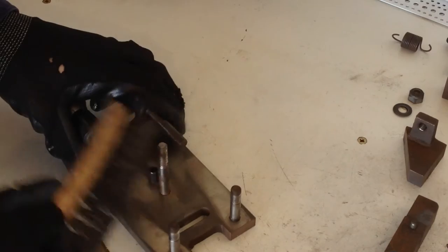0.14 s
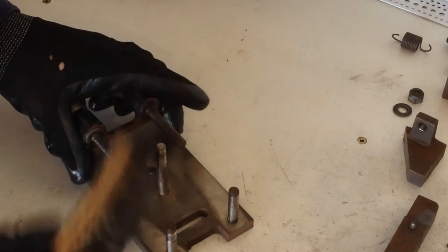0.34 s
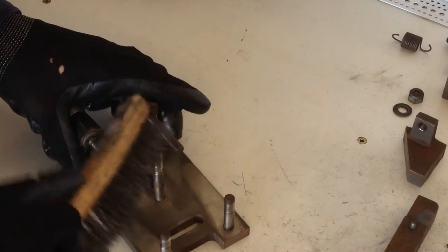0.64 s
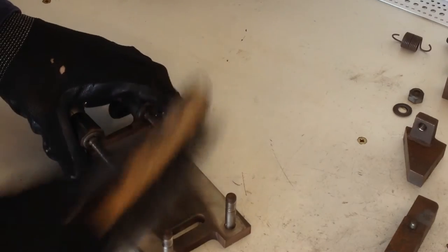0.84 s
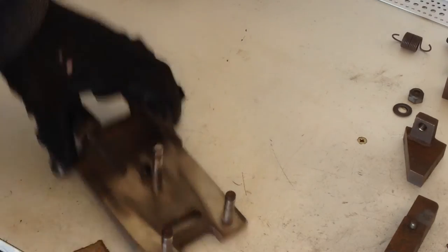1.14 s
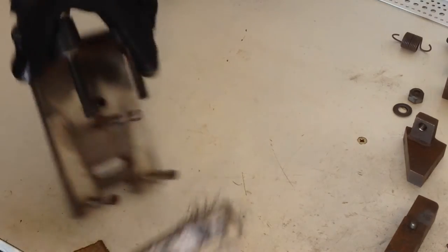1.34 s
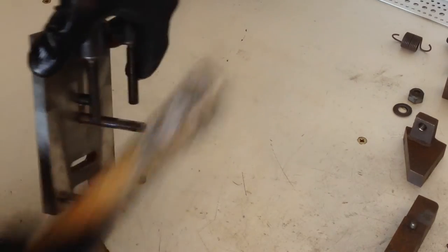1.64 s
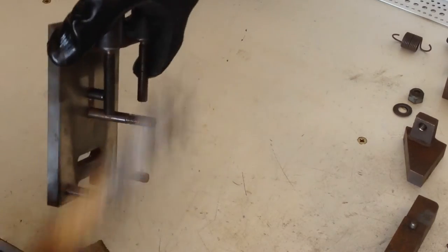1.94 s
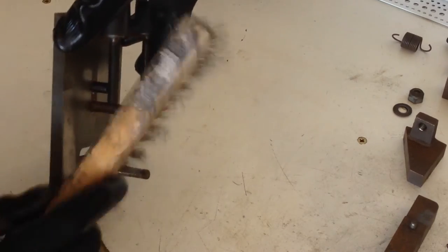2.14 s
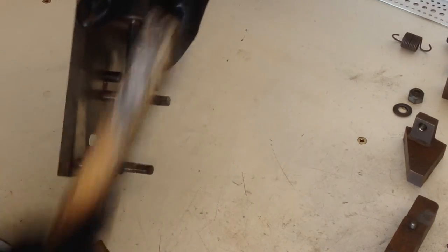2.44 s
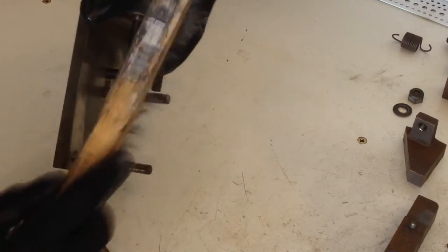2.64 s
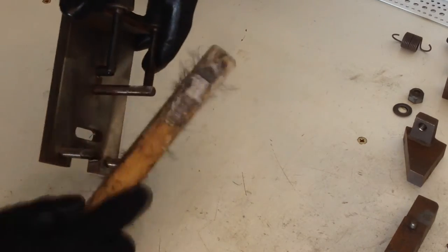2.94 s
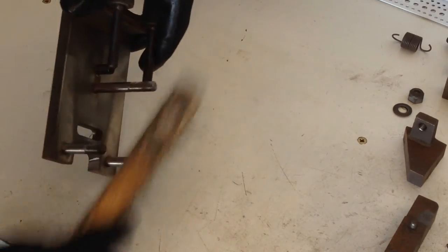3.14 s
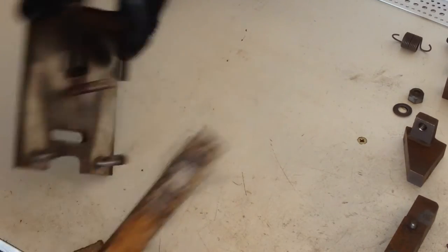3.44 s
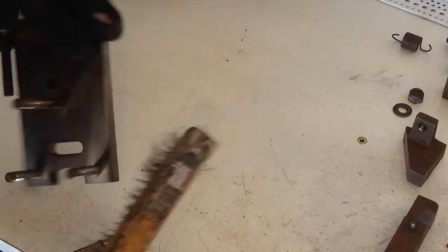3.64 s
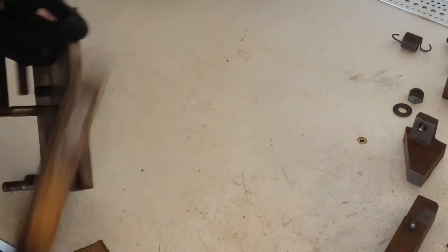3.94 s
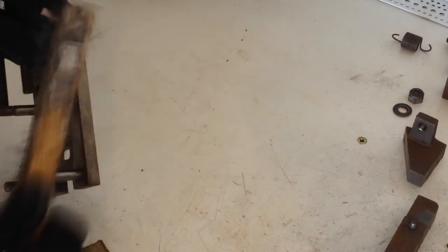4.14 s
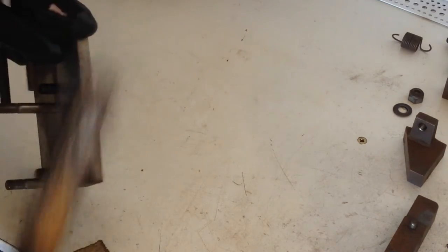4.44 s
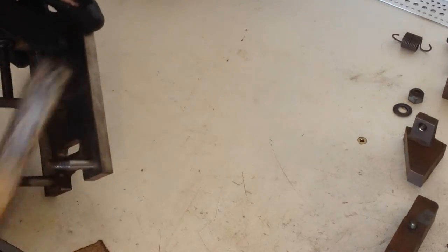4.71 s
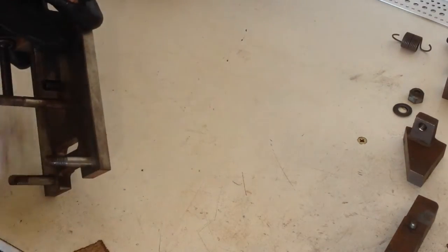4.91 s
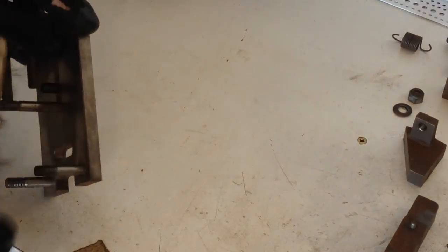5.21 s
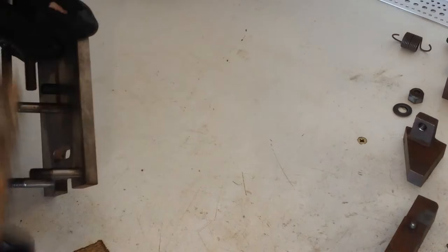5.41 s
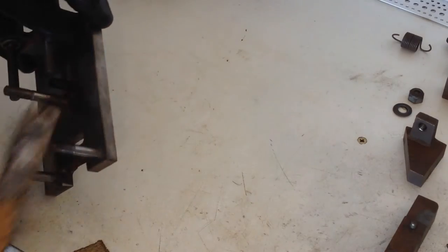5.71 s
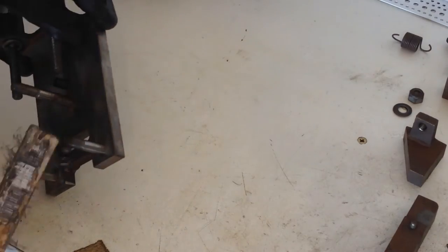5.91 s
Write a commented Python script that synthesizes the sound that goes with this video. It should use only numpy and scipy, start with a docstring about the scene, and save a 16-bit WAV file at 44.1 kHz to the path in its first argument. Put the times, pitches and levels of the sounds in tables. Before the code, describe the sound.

A wire brush scrubs a studded steel plate in quick, bright, rasping strokes, the bristles flicking off the metal and the wooden workbench booming softly underneath. Twice the brushing breaks off as the plate is knocked and dragged on the bench, the second time with the hardest knock. Then the strokes carry on. The sound is close, with short garage reflections and a faint hiss.

```python
"""A wire brush rasps in quick strokes over a studded steel plate on a garage workbench.
Wire tips land in bunches and flick off the steel; the studs squeak, the plate rings faintly
and the bench booms under it. A few times wood or steel knocks hard, and twice the plate is
dragged and turned on the bench. Short reflections and quiet air lie behind."""
import sys
import numpy as np
from scipy import signal
from scipy.io import wavfile
from scipy.ndimage import uniform_filter1d

SR = 44100
rng = np.random.default_rng(int(sys.argv[2]) if len(sys.argv) > 2 else 0)


def file_out(sig):
    """Save sig as 16-bit WAV at sys.argv[1]."""
    # one column per channel
    cols = np.atleast_2d(sig).T
    # limit, then scale
    lim = np.clip(cols, -1, 1)
    pcm = np.round(lim * 32767).astype(np.int16)
    wavfile.write(sys.argv[1], SR, pcm)


N = 267676


# start_s, land_db (re peak), rise_s, fall_s, peak_db, push_db, shake_db, bright_db, boom_hz, squeak_db
# push, shake and squeak are relative to the rasp
BRUSH_STROKES = [(0.058, -19, 0.079, 0.068, -22, -21, -23, -2.5, 306, -4.5),
                 (0.333, -6, 0.04, 0.071, -19, -15.5, -11, -26, 296, -9.5),
                 (0.501, -22, 0.019, 0.032, -22.5, -26, -18.5, -2.5, 480, -3),
                 (0.577, 3, .04, 0.12, -30, -11.5, -19, 4, 330, 2),
                 (0.857, -19.5, 0.047, 0.01, -22, -2.5, -11.5, -17, 604, 2),
                 (0.926, -15, 0.017, 0.074, -21, -13.5, -17.5, -2.5, 280, -13),
                 (1.598, -13, 0.09, 0.09, -33, -17, -40, 6.5, 220, -29),
                 (1.934, -18, 0.058, 0.08, -21.5, -20, -37.5, 2, 300, -28.5),
                 (2.221, -13, 0.051, 0.073, -21.5, -16.5, -36, 5, 175, -24),
                 (2.459, -10.5, 0.064, 0.081, -21.5, -19.5, -43, 4.5, 192, -30.5),
                 (2.7, -17.5, 0.062, 0.052, -24, -14.5, -48.5, 7.5, 200, -27),
                 (2.998, -12, 0.004, 0.061, -30, -11, -28, 4, 165, -34),
                 (3.053, -14, 0.032, 0.11, -23.5, -14.5, -43, 9, 212, -25),
                 (3.289, -8.5, 0.08, 0.088, -24, -15.5, -33, 4.5, 203, -30),
                 (3.93, -14, 0.066, 0.064, -33, -16, -31.5, 4, 192.4, -32),
                 (4.19, -21.5, 0.063, 0.077, -26, -17, -30, 4.5, 200, -29),
                 (4.441, -18, 0.073, 0.066, -26, -15, -38, 5, 190, -30.5),
                 (4.75, -12, 0.057, 0.079, -27, -18, -31, 4.5, 240, -30),
                 (5.031, -2, 0.067, 0.064, -31, -17.5, -14, 6, 400, -16),
                 (5.288, -20, 0.071, 0.02, -33, -11.5, -15.5, 9.5, 157, 0),
                 (5.406, -27, 0.037, 0.01, -36.5, -13.5, -25, -7, 158, -31),
                 (5.519, -28, 0.067, 0.055, -30.5, -13.5, -14.5, 6, 174, -19.5),
                 (5.773, 0.5, 0.057, 0.068, -29, -14, -28.5, 0, 186, -31.5),
                 (5.998, -1, 0.017, 0.05, -30.5, -12, -37.5, 0, 198, -18.5)]
def strokes():
    """Each stroke lands, swells to full pressure and lifts off, brightening as it goes."""
    lift_db, brighten_db = -39, 18
    level, push, shake, squeak = np.zeros((4, N))
    bright, boom_hz = np.ones(N), np.full(N, 200.)
    for start, land_db, rise, fall, peak_db, push_db, shake_db, bright_db, hz, squeak_db in BRUSH_STROKES:
        part, t = span(start, rise + fall)
        rising_db = land_db * abs(1 - t / rise) ** 2.13
        falling_db = lift_db * abs((t - rise) / fall) ** 2.16
        swell_db = np.where(t < rise, rising_db, falling_db)
        level[part] = gain_of(peak_db + swell_db)
        push[part] = gain_of(push_db - 0.48 * swell_db)  # bench and plate follow only part of the swell
        shake[part] = gain_of(shake_db - 0.27 * swell_db)
        bright[part] = gain_of(bright_db + brighten_db * (t / (rise + fall) - .5))
        boom_hz[part] = hz
        shake[part.stop:] = gain_of(shake_db)  # the grip stays
        squeak[part.start:] = gain_of(squeak_db)
    return uniform_filter1d(level, size=60), push, shake, bright, boom_hz, squeak


# Wire on steel: freq_hz, density_db
RASP_SPECTRUM = [(530, -53.5), (900, -39), (1210, -24.5), (1710, -12), (2420, -21), (4170, -1.5),
                 (5440, -6.5), (5820, -3), (10400, 1.5), (11800, -4), (12800, -17), (16600, -50.5),
                 (22000, -120)]
def brush():
    """Thousands of wire tips flick off the steel; the same stroke shakes plate and bench."""
    level, push, shake, bright, boom_hz, _ = strokes()
    flicks = clicks(per_s=13000, spread_db=0.5, clump_db=2.8, clump_s=0.0062)
    force = level * flicks
    rasp = coloured(wire_tips(force), RASP_SPECTRUM)
    dull = lowpass(rasp, 7000)
    rasp = dull + bright * (rasp - dull)  # a steeper brush sounds brighter
    plate_force = (level + gain_of(-9.5) * slap_force()) * flicks * shake
    steel = plate(plate_force) + edges(force * gain_of(-17.5))
    return gain_of(-5) * rasp + steel + bench(force * push, boom_hz, octaves=1.0, floor_db=-3)


def wire_tips(force):
    """Each click frees a wire tip, which rings a few cycles at its own pitch."""
    wire = rng.integers(0, 24, N // 40 + 1).repeat(40)[:N]  # neighbours in a tuft let go together
    pitches_hz = np.geomspace(2500, 13000, 24)
    rings = sum(rubbed(force * (wire == k), [(hz, 0, 14 / hz)]) for k, hz in enumerate(pitches_hz))
    return force + 0.66 * rings


# Bristle bunches hitting an edge or stud: start_s, level_db, pitch_hz, t60_s
BRISTLE_SLAPS = [(0.0244, -11, 9400, 0.011), (0.0764, -15, 9600, 0.021), (0.2942, -2.5, 9000, 0.02),
                 (0.341, 12, 7800, 0.01), (0.4016, -5.5, 6550, 0.027), (0.5152, -35, 9900, 0.069),
                 (0.552, -20, 9570, 0.09), (0.5811, -10.5, 9000, 0.085), (0.701, -21, 9650, 0.083),
                 (0.7407, -19.5, 9800, 0.045), (0.8575, -5, 7500, 0.017), (0.9315, -15, 3900, 0.075),
                 (1.027, -31, 8000, 0.048), (1.151, -25, 4500, 0.033), (1.602, -17, 4000, 0.025),
                 (1.6769, -10, 7680, 0.03), (1.729, -18.5, 4180, 0.032), (1.938, -23, 9200, 0.027),
                 (1.96, -10.5, 7500, 0.036), (2.224, -19, 3920, 0.032), (2.4583, -34, 9710, 0.03),
                 (2.7, -19.5, 5880, 0.041), (2.721, -12.5, 7440, 0.036), (3.0021, -16, 3860, 0.039),
                 (3.0614, -6.5, 8980, 0.018), (3.265, -34, 9250, 0.049), (3.296, -3, 10600, 0.016),
                 (3.332, -13, 10700, 0.14), (3.932, -28.5, 4745, 0.049), (4.185, -26, 3330, 0.037),
                 (4.205, -20.5, 10800, 0.04), (4.4417, -12, 3900, 0.032), (4.746, -27.5, 9300, 0.041),
                 (5.033, -9.5, 8900, 0.039), (5.29, -20.5, 8800, 0.022), (5.3403, -6, 9500, 0.022),
                 (5.3588, -12.5, 8700, 0.035), (5.5174, -17.5, 9100, 0.032), (5.5866, -30, 9140, 0.028),
                 (5.625, -27, 4000, 0.047), (5.708, -22.5, 4840, 0.083), (5.7506, -13.5, 6500, 0.021),
                 (5.769, -12, 3580, 0.05), (5.8387, -11.5, 8980, 0.032), (6.002, -17, 9530, 0.033),
                 (6.053, -23, 9400, 0.07)]
def slaps():
    """Each bunch is a sudden spray of tips, part of it around one pitch."""
    out, t = np.zeros(N + 4000), np.arange(4000) / SR
    sprays = coloured(rng.standard_normal(len(BRISTLE_SLAPS) * 4000), RASP_SPECTRUM).reshape(-1, 4000)
    for (start, db, hz, t60), spray in zip(BRISTLE_SLAPS, sprays):
        band = signal.lfilter(*signal.iirpeak(hz, 3.5, SR), spray)
        envelope = gain_of(db - 10 - 60 * t / t60) * np.minimum(t / 0.0039, 1)
        out[round(start * SR):][:4000] += envelope * (0.9 * spray + unit_rms(band))
    return out[:N]


def slap_force():
    """Each slap gives the steel a fast-dying shove."""
    out, t = np.zeros(N + 4000), np.arange(4000) / SR
    for start, db, _, t60 in BRISTLE_SLAPS:
        out[round(start * SR):][:4000] += gain_of(db - 60 * t / t60)
    return out[:N]


# Stud resonances: pitch_hz, level_db, t60_s
STUD_MODES = [(9698, 0, .03), (9450, -6, .022), (9900, -8, .022)]
def studs():
    """Clumps of tips catch the studs, which ring high and short."""
    level, *_, squeak = strokes()
    pressure = (level + gain_of(-17.5) * slap_force()) * squeak
    catches = clicks(per_s=3000, spread_db=2.5, clump_db=4, clump_s=.008)
    return rubbed(pressure * catches, STUD_MODES)


# Steel edge resonances: pitch_hz, level_db, t60_s
EDGE_MODES = [(3350, -3, .04), (3978, 0, .05), (4450, -2, .035), (5820, -4, .03), (6500, -4, .03),
              (7450, -2, .03), (8400, -3, .03)]
def edges(force):
    """The brush passes one edge after another, so each mode sings only now and then."""
    t, chance = np.arange(N) / SR, rng.standard_normal((len(EDGE_MODES), 130))
    nearness_db = [4.5 * np.interp(t, np.arange(130) * .05, row) for row in chance]
    return sum(rubbed(force * gain_of(mode[1] + db), [mode]) for db, mode in zip(nearness_db, EDGE_MODES))


# Plate resonances, short and long: pitch_hz, level_db, t60_s
PLATE_MODES = [(1606, -11, .03), (1770, -4, .035), (1902, 0, .07), (2030, -8, .025)]
LOOSE_MODES = [(1936, -8, .8)]
GRIP_S = 1.6
def plate(force):
    """The short modes always answer; the long one is driven only until a hand grips the plate."""
    loose = np.arange(N) < GRIP_S * SR
    return rubbed(force, PLATE_MODES) + rubbed(force * gain_of(-25.5) * loose, LOOSE_MODES)


# Wooden top resonances: pitch_hz, level_db, t60_s
BENCH_MODES = [(71, 15, 0.11), (140.1, 10, 0.073), (158, -10, 0.083), (233, -1.5, 0.15), (267.2, 2.5, 0.05),
               (313.7, 0.5, 0.038), (320, -1, 0.015), (480, -4, 0.14), (576.4, 2.5, 0.039),
               (612.3, 0.5, 0.057), (672, 5.5, 0.031), (745, -3, 0.021), (838, -21.5, 0.02),
               (1063, -10.5, .05)]
def bench(force, boom_hz, octaves, floor_db):
    """The bench top booms; modes near boom_hz answer most, as grip and contact change."""
    weights = [gain_of(db) * bench_weight(hz, boom_hz, octaves, floor_db) for hz, db, _ in BENCH_MODES]
    total = np.sqrt(sum(w ** 2 for w in weights))
    return sum(rubbed(force * w / total, [mode]) for w, mode in zip(weights, BENCH_MODES))


def bench_weight(hz, boom_hz, octaves, floor_db):
    """A mode answers fully near boom_hz, and a little everywhere but in the deep bass."""
    peak = gain_of(-6 * (np.log2(hz / boom_hz) / octaves) ** 2)
    return peak + gain_of(floor_db) * min(hz / 250, 1) ** 1.8


# Blows on wood or steel: start_s, bench_db, crack_db, plate_db, boom_hz; each level on its own scale
HARD_KNOCKS = [(0.116, -27, -30, -39.5, 286), (0.292, -40, -19.5, -30.5, 417), (0.341, -35, -2, -58.5, 444),
               (0.407, -52, -7.5, -35, 400), (0.619, -23.5, -24, -42.5, 680),
               (0.642, -24.5, -17.5, -48, 260), (0.739, -41, -35, -52, 322),
               (0.856, -23, -14.5, -36.5, 700), (0.888, -7, -2.5, -20.5, 679), (1.265, -27, -48, -68, 690),
               (1.303, -33, -18, -78, 490), (1.331, -17.5, -10, -24, 713), (3.267, -21, -38.5, -52, 563),
               (3.547, -30, -55.5, -46.5, 500), (3.597, 0, 6, -23, 610), (3.69, -28, -60, -70, 140),
               (3.82, -35, -60, -70, 148), (3.895, -40.5, -60, -73, 140), (3.948, -52.5, -60, -70, 144.6),
               (4.763, -49.5, -21.5, -43.5, 392)]
def knocks():
    """A brief rough blow rings bench and plate, with a short crack on top."""
    out, t = np.zeros(N + SR), np.arange(SR) / SR
    for start, bench_db, crack_db, plate_db, boom_hz in HARD_KNOCKS:
        noise = rng.standard_normal(SR)
        blow = (noise * gain_of(-60 * t / 0.014))[:2000]
        wood = sum(ring(m) * bench_weight(m[0], boom_hz, octaves=0.11, floor_db=-17) for m in BENCH_MODES)
        steel = sum(map(ring, PLATE_MODES + LOOSE_MODES if start < GRIP_S else PLATE_MODES))
        thud = signal.oaconvolve(blow, wood)[:SR]
        clang = signal.oaconvolve(blow, steel)[:SR]
        crack = coloured(noise, ROUGH_SPECTRUM) * gain_of(-60 * t / 0.034)
        for part, db in (thud, bench_db), (clang, plate_db - 9), (crack, crack_db - 8):
            out[round(start * SR):][:SR] += gain_of(db) * part / abs(part).max()
    return out[:N]


# Rough noise of drags, knock cracks and knock tail: freq_hz, density_db
ROUGH_SPECTRUM = [(590, -30.5), (1000, -3), (1260, -11.5), (1620, -6), (3880, -15.5), (4270, -13),
                  (11100, -22.5), (12800, -34), (16600, -60), (22000, -120)]
# Drags of the plate and, in the last row, rumble and rough reverberation after the hardest knock:
# start_s, rise_s, hold_s, fade_s, rumble_db, from_hz, to_hz, rough_db (re rumble), onset_db (re rough)
RUMBLES = [(1.066, 0.017, 0.0075, 0.15, -49.5, 312, 330, 7.5, -4),
           (1.152, 0.024, 0.076, 0.12, -31, 636, 558, -5, -22),
           (1.321, 0.029, 0.12, 0.16, -14.5, 790, 312, -16.5, -0.5),
           (3.522, 0.035, 0.037, 0.015, -27.5, 440, 350, -20.5, -4),
           (3.615, 0.027, 0.045, 0.42, -33.5, 556, 155, -9, -1.5)]
def drags_and_knock_tail():
    """The bench rumbles with rough noise on top, as the plate is dragged or the hardest knock dies away."""
    sag_db, fade_db, build_s = -3.5, -38, 0.056
    level, rough_gain, boom_hz = np.zeros(N), np.zeros(N), np.full(N, 300.)
    for start, rise, hold, fade, rumble_db, from_hz, to_hz, rough_db, onset_db in RUMBLES:
        part, t = span(start, rise + hold + fade)
        corners_s = np.cumsum([0, rise, hold, fade])
        decay_db = np.interp(t, corners_s, [0, 0, sag_db, fade_db])
        level[part] = np.minimum(t / rise, 1) * gain_of(rumble_db + decay_db)
        rough_gain[part] = gain_of(rough_db + onset_db * np.maximum(1 - t / build_s, 0))
        boom_hz[part] = from_hz * (to_hz / from_hz) ** (t / corners_s[-1])
    force = level * clicks(per_s=4000, spread_db=1.0, clump_db=-1.5, clump_s=0.0097)
    rough = force * rough_gain
    dull = lowpass(coloured(rough, ROUGH_SPECTRUM), 7530)
    return bench(force, boom_hz, octaves=0.4, floor_db=-14.5) + dull + plate(rough * gain_of(-14.5))


# Room decay: freq_hz, t60_s
GARAGE_DECAY = [(100, 1), (400, 0.17), (1500, 0.51), (5000, 0.33), (12000, 0.27)]
def garage(x):
    """Sparse reflections of random sign, each band dying at its own speed."""
    taps = np.zeros(SR // 2)
    slots = np.arange(200, len(taps) - 20, 20)
    taps[slots + rng.integers(0, 20, len(slots))] = rng.choice([-1., 1.], len(slots))
    hz, t, bands = signal.stft(taps, SR, nperseg=256)
    decay = gain_of(-60 * t / value_at(GARAGE_DECAY, hz)[:, None])
    tail = signal.istft(bands * decay, SR, nperseg=256)[1]
    return convolved(x, tail)


# Room noise: freq_hz, density_db
AIR_SPECTRUM = [(12, -47.5), (20, -15.5), (136, -7.5), (556, -12.5), (1320, -20), (4000, -17.5),
                (5250, -15.5), (9510, -8.5), (11500, -9), (12800, -28.5), (16600, -69), (22000, -120)]
def air():
    """The steady, quiet hiss of the garage."""
    return gain_of(-57) * coloured(rng.standard_normal(N), AIR_SPECTRUM)


def clicks(per_s, spread_db, clump_db, clump_s):
    """Random clicks, a few of them large, swelling in clumps."""
    size = gain_of(spread_db * np.minimum(rng.exponential(1, N), 5)) * rng.choice([-1., 1.], N)
    clumps = unit_rms(signal.lfilter([1], [1, -np.exp(-1 / (clump_s * SR))], rng.standard_normal(N)))
    hits = rng.random(N) < per_s / SR
    return unit_rms(size * hits * gain_of(clump_db * clumps))


def ring(mode):
    """One dying sine that swells over its first cycles."""
    hz, db, t60 = mode
    t = np.arange(SR) / SR
    swell = 1 - np.exp(-(t * hz / 1.734) ** 2)
    return swell * gain_of(db - 60 * t / t60) * np.sin(2 * np.pi * hz * t)


def rubbed(force, modes):
    """A rough force rings all modes."""
    body = sum(ring(mode) / np.sqrt(mode[2]) for mode in modes)
    longest_s = max(mode[2] for mode in modes)
    return convolved(force, body[:round(longest_s * SR)])


def coloured(x, spectrum):
    """Minimum-phase filter: a click stays a click."""
    hz = abs(np.fft.fftfreq(4096, 1 / SR))
    log_gain = np.log(gain_of(np.maximum(value_at(spectrum, hz), -100)))
    response = np.exp(np.conj(signal.hilbert(log_gain)))
    return convolved(x, np.fft.ifft(response).real[:2048])


def convolved(x, taps):
    """Filters with taps scaled to unit energy."""
    return signal.oaconvolve(x, taps / np.linalg.norm(taps))[:len(x)]


def lowpass(x, hz):
    return signal.sosfilt(signal.butter(1, hz, fs=SR, output="sos"), x)


def value_at(table, hz):
    freq_hz, value = np.transpose(table)
    return np.interp(np.log(hz + 1), np.log(freq_hz + 1), value)


def span(start_s, length_s):
    """Sample slice of an event and the time since its start."""
    part = slice(round(start_s * SR), min(round((start_s + length_s) * SR), N))
    return part, np.arange(part.stop - part.start) / SR


def gain_of(db):
    return 10 ** (np.asarray(db) / 20)


def unit_rms(x):
    return x / np.sqrt(np.mean(abs(x) ** 2) + 1e-20)


def scene():
    """Work at the bench, its reflections and the air, in mono."""
    near = brush() + studs() + slaps() + knocks() + drags_and_knock_tail()
    return (near + air() + gain_of(-12) * garage(near))[None]


def record(dry):
    """A small microphone drops the deep bass, clips at full scale and cuts the top treble."""
    thin = signal.sosfilt(signal.butter(2, 45, "high", fs=SR, output="sos"), dry)
    band_limit = signal.firwin(255, 12950, window=("kaiser", 7), fs=SR)
    return signal.oaconvolve(np.clip(thin, -1, 1), band_limit[None], "same")


dry = scene()
out = record(dry)
file_out(out)
```